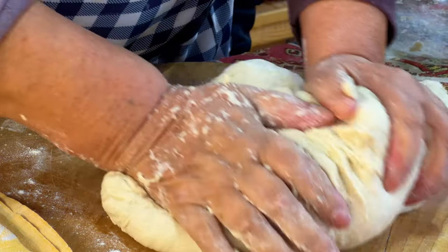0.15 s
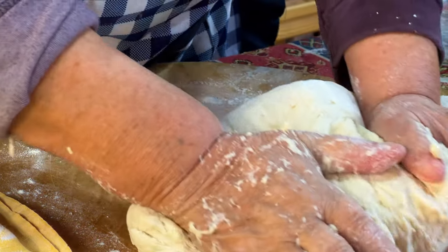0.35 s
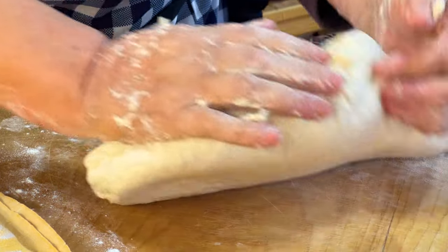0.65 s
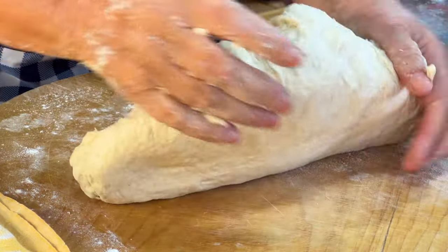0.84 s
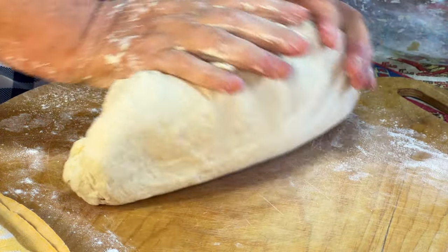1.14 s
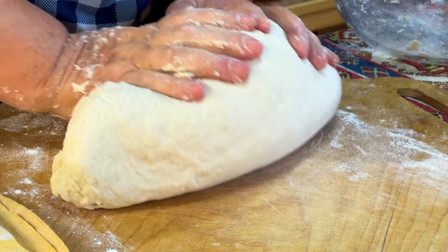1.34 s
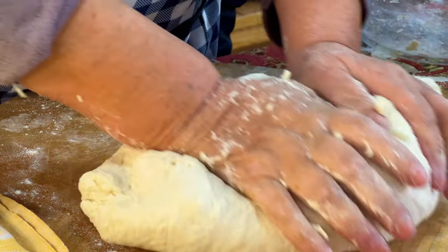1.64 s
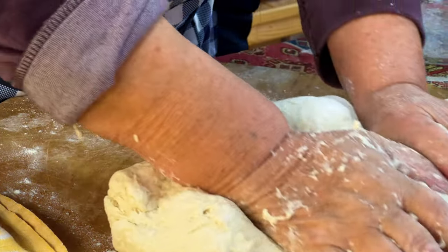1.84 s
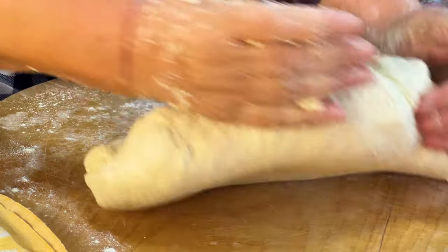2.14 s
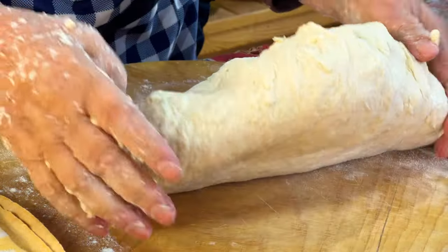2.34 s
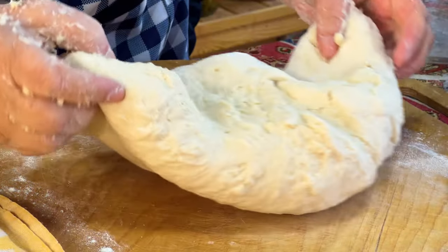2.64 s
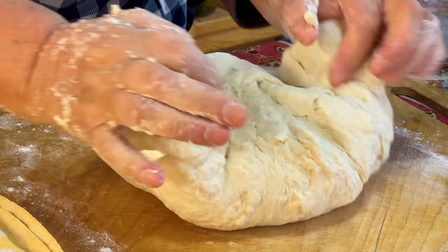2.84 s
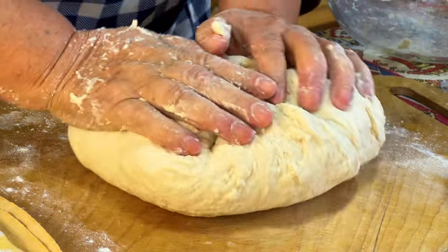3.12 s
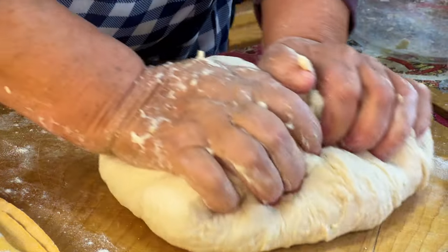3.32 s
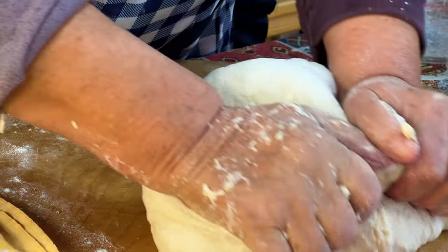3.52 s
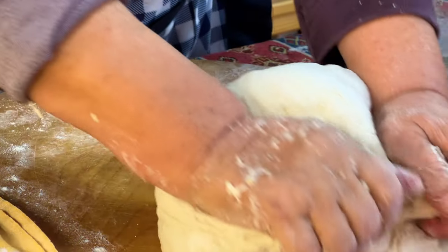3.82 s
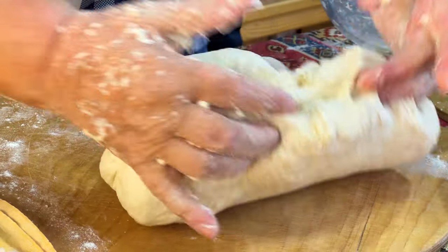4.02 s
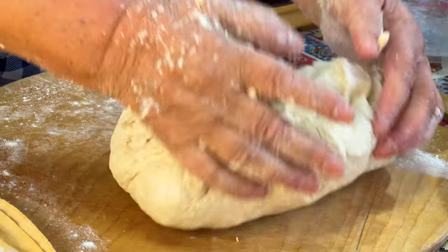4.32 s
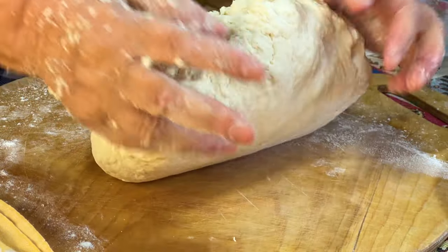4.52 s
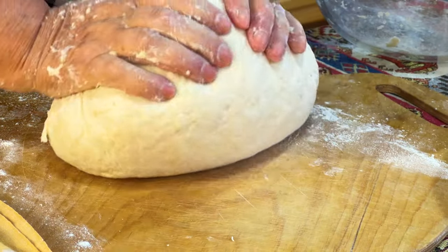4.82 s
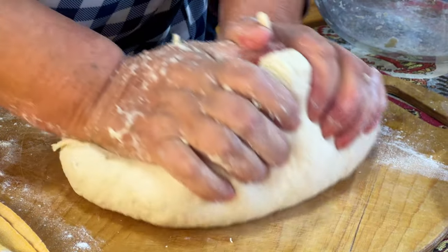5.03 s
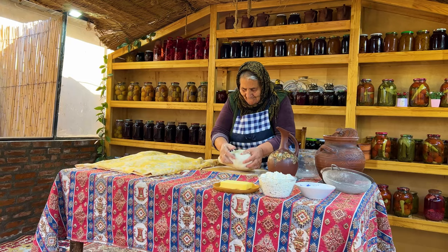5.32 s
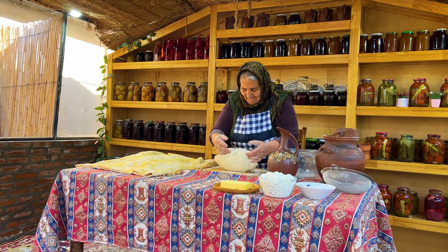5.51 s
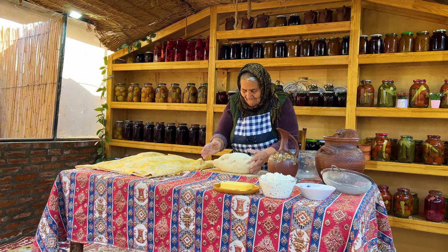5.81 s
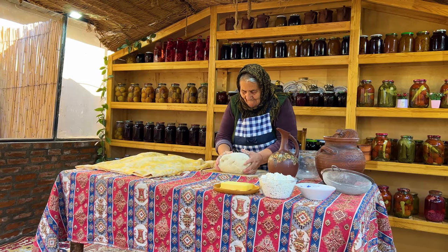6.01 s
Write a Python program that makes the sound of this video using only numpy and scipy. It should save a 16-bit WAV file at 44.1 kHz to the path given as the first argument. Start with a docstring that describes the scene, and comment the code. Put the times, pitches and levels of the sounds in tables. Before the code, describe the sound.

Uneven kneading in a small, dry room, miked close and nearly central. Deep soft thuds and a trembling table lie under grainy, tacky rubbing, short drags and moist slaps. The hardest blow knocks the board before halfway; a thin squeak and clack follow, then another cluster of thumps. In the last moments the sound turns more distant and roomier, with two almost joined clacks.

```python
"""Bread dough is kneaded by hand on a floured wooden board on a table, heard at first from close by.
From the start palms rub and drag the dough (banded noise in tiny slips, sticky ticks), the leaning arms
make the table tremble and squash the dough (noise and a wandering resonance), shoves boom and knocks ring
(decaying sines), and pats smack and pop (noise bursts and sines). The loudest knock comes near 2.4 s, a thin
squeak and a clack of the board just after 3.1 s, and from 5.5 s the work, with two more clacks, is across the room."""
import sys
import numpy as np
from scipy import signal
from scipy.fft import rfft, irfft, next_fast_len
from scipy.io import wavfile
from scipy.ndimage import uniform_filter1d

SR = 44100
rng = np.random.default_rng(int(sys.argv[2]) if len(sys.argv) > 2 else 0)


def transcribe(signal):
    """Save signal, clipped to [-1, 1], as a 16-bit WAV file at the path in sys.argv[1]."""
    frames = np.atleast_2d(signal).T
    limited = np.clip(frames, -1, 1)
    pcm = np.round(limited * 32767).astype(np.int16)
    wavfile.write(sys.argv[1], SR, pcm)


N = 271744
TIME = np.arange(N) / SR

# All event levels are relative: each source weighs them further.
# the lump dragged over the floured board:
# (time of peak [s], rise [s], fall [s], level [dB], brightness [dB])
DRAGS = [(0.679, 0.11, 0.07, -32.5, 1.5), (1.549, 0.095, 0.069, -43, 0), (2.161, 0.071, 0.1, -31.0, 2),
         (2.695, 0.12, 0.047, -34.5, 3), (3.501, 0.22, 0.12, -44.0, -23), (3.978, 0.11, 0.15, -37.5, 1),
         (5.96, 0.058, 0.094, -50.5, -6), (6.165, 0.083, 0.044, -47.0, 0.5)]
# palms rubbing over the dough: (time of peak [s], rise [s], fall [s], level [dB], brightness [dB])
RUBS = [(0.0, .1, 0.12, -43, -0.5), (0.228, 0.087, .035, -45.5, 2), (0.32, 0.057, 0.039, -42, -4),
        (1.03, 0.096, .07, -46, 1), (1.14, 0.12, 0.041, -46.5, -9), (1.27, 0.098, 0.051, -42.5, -0.5),
        (1.69, 0.43, 0.32, -45, -2), (2.437, 0.13, 0.063, -43, -2), (2.86, 0.067, 0.056, -47.5, 2),
        (2.98, 0.11, .09, -50, -14), (3.154, 0.095, 0.067, -45, -1.5), (3.28, 0.052, 0.083, -45.5, 2.5),
        (3.65, 0.19, 0.17, -48, -2), (4.39, 0.18, 0.18, -49.5, -20), (4.475, 0.055, 0.048, -48.5, 7),
        (4.598, .007, 0.16, -43.5, 0.5), (4.818, .09, 0.049, -43.5, -1), (5.03, 0.082, 0.072, -43.5, -4.5),
        (5.2, 0.22, 0.21, -48.5, -3), (5.503, 0.0094, 0.074, -51, 4.5)]
# a sleeve brushing along as the arm stretches out in a long push: (time of peak [s], level [dB])
SLEEVES = [(0.444, -42.5), (1.932, -44), (3.77, -48.5), (5.384, -47.0)]
SLEEVE_RISE_S, SLEEVE_FALL_S = 0.1, 0.094
# band balance of each kind of slide: (low rasp [dB], middle rub [dB], high hiss [dB])
DRAG_COLOUR_DB = (-1.5, -1.5, -3.5)
RUB_COLOUR_DB = (-4.5, 0.1, -5)
SLEEVE_COLOUR_DB = (0.7, -5, 1.05)
# hands that merely lie on the dough: (low rasp [dB], middle rub [dB], high hiss [dB])
RESTING_DB = (-60, -64, -71)
STROKE_SHAPE = 1.77  # exponent of a stroke's swell and fade: 1 pointed, 2 round
BRIGHT_THINS = 0.24  # share of a stroke's brightness that its low rasp loses
SQUEAK_S, SQUEAK_HZ, SQUEAK_DB = 3.15, 4260, -58

# the arms leaning on the dough:
# (time of full weight [s], hold [s], table rumble level [dB], dough squashing level [dB])
LEANS = [(-0.05, .3, -28, -41), (0.457, 0.15, -29.5, -38), (0.752, 0.056, -29.5, -40.5),
         (0.895, 0.66, -27.5, -39.5), (1.56, 0.6, -30.5, -45), (2.012, 0.17, -27.5, -37.5),
         (2.388, 0.035, -25.5, -31), (2.487, 0.29, -34.5, -45), (2.821, 0.47, -28.5, -43),
         (3.36, 0.64, -28, -44), (3.909, 0.14, -29, -34.5), (4.28, 0.14, -31.5, -40),
         (4.528, 0.22, -29.5, -42.5), (4.905, 0.29, -35, -44.5), (5.336, 0.44, -29, -47),
         (5.875, .28, -33, -45)]
LEAN_ATTACK_S, LEAN_RELEASE_S = 0.051, 0.056  # linear rise; time constant of the decay
RESTING_RUMBLE_DB, RESTING_SQUASH_DB = -38.5, -47
# main resonance of the table, shifting with the place of the push: (time [s], frequency [Hz])
TABLE_PITCH = [(0, 93.03), (3.2, 88.26), (4.7, 92.8), (5.2, 87.83), (5.45, 72.54), (5.75, 72.3), (6.16, 88)]

# shoves that set the table booming: (time [s], level [dB], frequency [Hz])
SHOVES = [(0.219, -30, 100.5), (0.764, -25, 96.5), (0.89, -18, 62), (1.096, -13.5, 84.6),
          (1.227, -11.5, 105), (1.41, -19, 91.6), (1.464, -15.5, 80), (1.874, -20, 87), (2.398, -12.5, 65),
          (2.836, -17.5, 93.5), (2.957, -10, 84), (3.005, -13.5, 89), (3.433, -15.5, 87),
          (3.557, -16.5, 93), (3.795, -20, 81), (3.942, -14, 93), (4.139, -17, 84), (4.283, -16.5, 75),
          (4.376, -20, 87.5), (4.512, -22, 86), (5.019, -20, 84.6), (5.58, -15, 71), (5.741, -23.5, 96),
          (5.896, -21, 125), (6.069, -17.5, 69)]
# the board knocking under the lump: (time [s], level [dB], settled base frequency [Hz], base T60 [s])
KNOCKS = [(0.03, -28, 194, 0.045), (0.225, -28, 306, 0.1), (0.875, -14.5, 235.5, 0.067),
          (0.958, -19, 178, 0.022), (1.096, -23, 200, 0.058), (1.24, -16, 190, 0.04),
          (2.066, -21, 224, 0.073), (2.336, -21.5, 183, 0.047), (2.382, -5.5, 256, 0.083),
          (2.397, -18.5, 228, 0.11), (2.423, -21.5, 231.4, 0.24), (3.222, -26.5, 365, 0.26),
          (3.952, -42, 219, 0.06), (4.001, -34, 227, 0.07), (4.134, -21, 269, 0.043),
          (4.272, -14.5, 264, 0.024), (4.307, -10, 169, 0.077), (4.548, -22, 170, 0.069),
          (5.021, -20, 217, 0.052), (5.74, -16.5, 272, 0.028)]
# modes of the board: (multiple of the base frequency [ratio], level [dB])
BOARD = [(0.999, 1), (1.42, -18.5), (1.9, -10)]
# pats of skin on dough:
# (time [s], level [dB], trapped-air frequency [Hz], treble share [dB], smack rise [s], smack T60 [s])
PATS = [(0.563, -24.5, 570, -19, 0.0072, 0.051), (0.577, -21.5, 1914, -40, 0.0037, 0.086),
        (0.874, -19, 924, -18.5, 0.00078, 0.095), (0.959, -31.5, 610, -18, 0.00086, 0.022),
        (2.057, -21, 1280, -42, 0.0013, 0.1), (2.075, -18, 1190, -36, 0.0026, 0.085),
        (2.377, -18.5, 1157, -17, 0.0017, 0.02), (2.417, -18.5, 1460, -22, 0.0012, 0.06),
        (3.889, -26, 1300, -17.5, .007, 0.18), (3.961, -23.5, 1150, -29, 0.0055, 0.045),
        (4.103, -42, 1090, 3, 0.013, 0.049), (4.255, -20.5, 690, -23, 0.0035, 0.033),
        (4.272, -25.5, 666, -9.5, 0.0008, 0.073), (4.355, -31, 890, -38, 0.00094, 0.043),
        (4.548, -32.5, 600, -37, 0.0013, 0.025), (4.6, -42, 730, -21, .0015, 0.016)]
# the board tipping and clacking on the table:
# (time [s], level [dB], factor on the mode frequencies [ratio], scrape level [dB])
CLACKS = [(3.2471, -15.5, 0.91, -25), (5.73, -21, 0.9, -7), (5.7376, -11.5, 0.99, -22)]
# modes the clacks ring with, before that factor: (frequency [Hz], level [dB], T60 [s])
CLACK_MODES = [(183, -9, 0.046), (345, -7, 0.031), (786, -8, 0.028), (1040, -1.5, 0.014),
               (2160, -7.5, 0.013), (2730, -10, 0.016), (4140, -20, .011)]

# spectra of sliding, cracking wood, table rumble, squashed dough and pats:
# (frequency [Hz], relative density [dB per Hz])
RUB = [(200, -1), (450, -0.5), (600, -4), (820, -7), (1050, -3.5), (1300, -2), (1600, -3), (2500, 1),
       (3200, -7.5), (4000, -20.5), (5300, -16.5), (7200, -13.5), (8400, -17.5), (9700, -33.5),
       (12000, -31.5), (16000, -33)]
CRACK = [(300, 4), (1000, 17.5), (1450, 1), (2200, 3), (3300, 4.5), (6200, 1), (8500, -11), (16000, -20)]
RUMBLE = [(20, -36), (33, -29), (48, -3.5), (62, 9), (80, 1.5), (100, 3), (125, 4), (170, -10.5),
          (300, -40.5), (2000, -110)]
SQUASH = [(30, -51), (110, -4), (170, 0.5), (240, -2), (330, -2.5), (450, -8.5), (700, -31), (3000, -108)]
PAT = [(200, -4), (450, 2.5), (700, 0.5), (1100, 0.5), (1600, 0.5), (2400, 0.5), (3200, -5.5), (4100, -15),
       (5500, -10.5), (7500, -3), (9500, -22), (16000, -27)]
# spectrum of the still air of the room: (frequency [Hz], relative density [dB per Hz])
AIR = [(25, 11), (70, -6), (200, 0.5), (500, -45), (1500, -25), (4000, -37), (8000, -34), (12000, -37.5),
       (16000, -38)]
# correlation of left and right in all coloured noise: (frequency [Hz], likeness [0 to 1])
LIKENESS = [(60, 1), (290, 1), (640, 0.8), (1400, 1), (7000, 1), (10000, 0.94), (14000, 1)]
# phase between left and right in the close part, read as constant below the second row:
# (frequency [Hz], lead of the left [rad])
NEAR_PHASE = [(0, 0), (780, 0.2), (1720, -0.3), (3190, 0.7), (5250, 0.0), (8700, 0.1), (9730, -3.1),
              (10400, -3.1), (11700, -6.1), (12400, -6.4), (13200, -8.9), (14300, -9.8), (15200, -12.5),
              (16500, -12.6)]
# phase between left and right from across the room, where the left lags in the table's low notes:
# (frequency [Hz], lead of the left [rad])
FAR_PHASE = [(50, -.1), (130, -.5), (250, -2.0), (420, -1.5), (620, -2.2), (1000, 0), (16000, 0)]

AIR_DB, ROOM_T60_S, NEAR_ROOM_DB, FAR_ROOM_DB = -40, 0.097, -17, -9.5
FAR_FROM_S = 5.48  # from here on the work is heard from across the room
NEAR_PAN_DB, FAR_PAN_DB = 0.4, 1.1  # gain to the right, equal loss to the left
CUTOFF_HZ = 15900


def friction(slides, drag_hz=1600, hiss_hz=3800, body_hz=850, bite=0.2, even_db=-46, grain_db=1.0,
             grains_per_s=900, slip_db=0.92, slips_per_s=130, catch_db=1.5, catches_per_s=110):
    """Stick-slip: skin and dough slide in tiny slips; heavy dragging sounds low, light brushing high."""
    drag_db, palm_db, hiss_db = 20 * np.log10(slides)
    # the harder the drag, the more its rasp stands out over its dull body
    rasp_db = np.clip(bite * (drag_db - even_db), -3, 3)
    # the rasp catches and lets go unevenly
    uneven_db = catch_db * flutter(catches_per_s)
    body = rms_one(cut(noise(RUB), [420, body_hz], "band", order=3)) * from_db(drag_db - rasp_db)
    rasp = rms_one(cut(noise(RUB), [body_hz, drag_hz], "band", order=3))
    rasp = rasp * from_db(drag_db + rasp_db + uneven_db)
    palm = rms_one(cut(noise(RUB), [drag_hz, hiss_hz], "band", order=4)) * from_db(palm_db)
    hiss = rms_one(cut(noise(RUB), hiss_hz, "high", order=4)) * from_db(hiss_db)
    slips = from_db(grain_db * flutter(grains_per_s) + slip_db * flutter(slips_per_s))
    return ((body + rasp) / np.sqrt(2) + palm + hiss) * rms_one(slips)


def slide_gains():
    """Power summation: overlapping slides add in power, in the low rasp, middle rub and high hiss."""
    sleeves = [(s, SLEEVE_RISE_S, SLEEVE_FALL_S, db, 0) for s, db in SLEEVES]
    kinds = ((DRAGS, DRAG_COLOUR_DB), (RUBS, RUB_COLOUR_DB), (sleeves, SLEEVE_COLOUR_DB))
    brightening = np.array([-BRIGHT_THINS, 0, 1])
    power = from_db(RESTING_DB)[:, None] ** 2 * np.ones(N)
    for rows, colour_db in kinds:
        for s, rise_s, fall_s, db, bright_db in rows:
            gains = from_db(db + np.array(colour_db) + bright_db * brightening)
            power += np.outer(gains, stroke(s, rise_s, fall_s)) ** 2
    return np.sqrt(power)


def stroke(s, rise_s, fall_s):
    """Sliding speed as an envelope: it gathers, peaks at 1 at time s and slows down."""
    side_s = np.where(TIME < s, rise_s, fall_s)
    away = np.abs(TIME - s) / np.maximum(side_s, 1e-3)
    return np.exp(-np.minimum(away, 8) ** STROKE_SHAPE)


def stickiness(palm, level_db=-16, per_s=160, spread_db=11.0, count=6):
    """Adhesion: tacky spots let go of the skin in tiny dry ticks, louder as the palms work harder."""
    sizes = from_db(np.minimum(spread_db * rng.exponential(1, N), 14))
    ticks = sizes * (rng.random(N) < per_s / SR)
    # each tick is dealt at random to one of several pitch bands
    dealt = rng.integers(0, count, N)
    out = np.zeros(N)
    for k, hz in enumerate(np.geomspace(900, 6500, count)):
        band = cut(ticks * (dealt == k) + 1e-18, [hz / 2, hz * 2], "band")
        out += rms_one(band) * from_db(at_hz(RUB, hz))
    return rms_one(out) * palm * from_db(level_db)


def squeak(length_s=0.041, width_hz=260):
    """Narrow-band friction tone: one faint, thin squeak as the dough is gripped."""
    tone = rms_one(flutter(width_hz) * np.sin(2 * np.pi * SQUEAK_HZ * TIME))
    return from_db(SQUEAK_DB) * stroke(SQUEAK_S, length_s, length_s) * tone


def pressing(drag, drag_db=-6, rumble_db=-2.0, mode_db=-0.5, mode_width_hz=14, squash_db=-0.27,
             lumpy_db=3.0, steady_s=0.0383):
    """Forced vibration: the arms' weight keeps the table trembling while the dough gives way in lumps."""
    table, dough = lean_gains()
    pitch_s, pitch_hz = np.transpose(TABLE_PITCH)
    turn = 2 * np.pi * np.cumsum(np.interp(TIME, pitch_s, pitch_hz)) / SR
    # random pushes feed the main resonance, so its strength and phase wander
    mode = rms_one(flutter(mode_width_hz) * np.cos(turn) + flutter(mode_width_hz) * np.sin(turn))
    tremble = from_db(rumble_db) * noise(RUMBLE) + from_db(mode_db) * mode
    # a steady push: evened out first, the tremble then follows the weight
    power = uniform_filter1d(np.mean(tremble ** 2, axis=0), int(steady_s * SR))
    tremble = tremble * np.sqrt(power.mean() / (power + 1e-6))
    # dough is squashed both by leaning and by dragging
    effort = np.hypot(dough, drag * from_db(drag_db))
    squash = noise(SQUASH) * effort * from_db(squash_db + lumpy_db * flutter(40))
    return tremble * table + squash


def lean_gains():
    """Static load: the weight comes on, is held and let go, driving table rumble and dough squashing."""
    gains = from_db([[RESTING_RUMBLE_DB], [RESTING_SQUASH_DB]]) * np.ones(N)
    for s, length_s, table_db, dough_db in LEANS:
        attack = np.clip((TIME - s) / LEAN_ATTACK_S + 1, 0, 1)
        release = np.exp(-np.clip(TIME - s - length_s, 0, 1) / LEAN_RELEASE_S)
        gains = np.maximum(gains, np.outer(from_db([table_db, dough_db]), attack * release))
    return gains


def shoves(level_db=0.5, rise_s=0.014, t60=0.083):
    """Damped oscillation: the heel of the hand lands softly and the table top swings a few cycles."""
    out, t = np.zeros(N), TIME[:SR // 2]
    for s, db, hz in SHOVES:
        boom = swell(t, rise_s, t60) * np.sin(2 * np.pi * hz * t)
        add(out, s, from_db(db + level_db) * boom)
    return out


def knocks(level_db=-3.0, rise_s=0.0016, sag=0.72, sag_s=0.0013, damping=0.91):
    """Modal ringing: the board's pitch sinks as dough settles on it; higher modes are damped first."""
    out, t = np.zeros(N), TIME[:SR // 2]
    # warped time: the pitch starts higher by the share sag and settles within milliseconds
    settling = t + sag * sag_s * (1 - np.exp(-t / sag_s))
    for s, db, hz, t60 in KNOCKS:
        for ratio, mode_db in BOARD:
            envelope = swell(t, rise_s, t60 / ratio ** damping)
            ring = envelope * np.sin(2 * np.pi * hz * ratio * settling)
            add(out, s, from_db(db + level_db + mode_db) * ring)
    return out


def pats(pop_db=-8, smack_db=-7.0, pop_t60=0.023, treble_hz=3800, treble_db=8.5, lead_db=-18, lead_s=0.0051):
    """Impact and air resonance: skin brushes and smacks the dough, and the air squeezed out pops."""
    out, t = np.zeros((2, N)), TIME[:SR // 5]
    brush = noise(PAT)
    for s, db, hz, share_db, rise_s, t60 in PATS:
        body = rms_one(cut(noise(PAT, size=len(t)), treble_hz, "low", order=4))
        treble = rms_one(cut(noise(PAT, size=len(t)), treble_hz, "high", order=4))
        contacts = body + treble * from_db(share_db + treble_db)
        smack = contacts * swell(t, rise_s, t60) * from_db(smack_db)
        pop = np.sin(2 * np.pi * hz * t) * swell(t, rise_s, pop_t60) * from_db(pop_db)
        add(out, s, from_db(db) * (smack + pop))
        out += brush * from_db(db + lead_db) * np.exp(-np.abs(TIME - s) / lead_s)
    return out


def clacks(rise_s=0.0013, crack_db=-8, crack_t60=0.048, lead_s=0.0025):
    """Impact excitation of modes: the wood scrapes for an instant, cracks on the table and rings."""
    out, t = np.zeros((2, N)), TIME[:SR // 5]
    scrape = noise(CRACK)
    for s, db, pitch, scrape_db in CLACKS:
        rings = np.zeros(len(t))
        for hz, mode_db, t60 in CLACK_MODES:
            rings += from_db(mode_db) * np.sin(2 * np.pi * hz * pitch * t) * swell(t, rise_s, t60)
        crack = noise(CRACK, size=len(t)) * from_db(crack_db - 60 * t / crack_t60)
        add(out, s, from_db(db) * (rings + crack))
        out += scrape * from_db(db + scrape_db) * np.exp(-np.abs(TIME - s) / lead_s)
    return out


def room(x, wall_hz=4500, lowest_hz=160):
    """Reverberation: dull, diffuse reflections, different in each ear."""
    t = TIME[:SR // 2]
    tail = cut(rng.standard_normal((2, len(t))), [lowest_hz, wall_hz], "band")
    tail = rms_one(tail * swell(t, 0.0008, ROOM_T60_S)) / np.sqrt(len(t))
    return signal.fftconvolve(x, tail, axes=1)[:, :N]


def still_air():
    """Stationary background noise: the still air of the room, steady throughout."""
    return from_db(AIR_DB) * left_right_phase(noise(AIR), NEAR_PHASE)


def left_right_phase(x, phase):
    """Interchannel phase: left and right differ in phase by an amount that depends on pitch."""
    size = next_fast_len(N + SR // 10)
    half = at_hz(phase, np.arange(size // 2 + 1) * SR / size) / 2
    return irfft(rfft(x, size) * np.exp(1j * half * [[1], [-1]]), size)[:, :N]


def noise(spectrum, size=N):
    """Spectral shaping: stereo noise of a given colour, largely alike in both ears; rms 1."""
    hz = np.arange(size // 2 + 1) * SR / size
    mid, side = rfft(rng.standard_normal((2, size)))
    alike = np.clip(at_hz(LIKENESS, hz), 0, 1)
    pair = np.sqrt(1 + alike) * mid + np.sqrt(1 - alike) * side * [[1], [-1]]
    return rms_one(irfft(pair * from_db(at_hz(spectrum, hz)), size))


def flutter(per_s):
    """Random modulation: straight lines between random knots, rms 1."""
    knots = np.arange(0, N / SR + 1, 1 / per_s)
    return rms_one(np.interp(TIME, knots, rng.standard_normal(len(knots))))


def swell(t, rise_s, t60):
    """Exponential decay after a soft contact: it builds up, then dies away; top 1."""
    shape = (1 - np.exp(-(t / rise_s) ** 2)) * from_db(-60 * t / t60)
    return shape / shape.max()


def cut(x, hz, kind, order=2):
    """Frequency selection by a Butterworth filter."""
    return signal.sosfilt(signal.butter(order, hz, kind, fs=SR, output="sos"), x)


def at_hz(points, hz):
    """Interpolation of a spectrum on a logarithmic frequency axis."""
    points = np.array(points)
    return np.interp(np.log(hz + 1), np.log(points[:, 0]), points[:, 1])


def add(out, s, sound):
    """Superposition: mix a sound in from time s."""
    start = int(s * SR)
    out[..., start:start + sound.shape[-1]] += sound[..., :N - start]


def rms_one(x):
    """Power normalisation: scale to unit mean power."""
    return x / np.sqrt(np.mean(x ** 2) + 1e-20)


def from_db(db):
    """Logarithmic level: decibels to amplitude gain."""
    return 10 ** (np.asarray(db) / 20)


def scene(far_db=-0.5):
    """Direct and reflected sound: close by dry and central, from afar roomier and a little to the right."""
    slides = slide_gains()
    drag, palm, _ = slides
    hands = friction(slides) + stickiness(palm) + squeak()
    work = hands + pressing(drag) + shoves() + knocks() + pats() + clacks()
    echo = room(work)
    near_gain = from_db([[-NEAR_PAN_DB], [NEAR_PAN_DB]])
    far_gain = from_db([[far_db - FAR_PAN_DB], [far_db + FAR_PAN_DB]])
    near = left_right_phase(work, NEAR_PHASE) * near_gain + from_db(NEAR_ROOM_DB) * echo
    far = left_right_phase(work, FAR_PHASE) * far_gain + from_db(FAR_ROOM_DB) * echo
    away = np.clip((TIME - FAR_FROM_S) / 0.02, 0, 1)
    return (1 - away) * near + away * far + still_air()


def record(dry, low_cut_hz=30):
    """Band limitation: the microphone loses the deepest bass; the top is cut steeply."""
    steep = signal.ellip(10, 0.1, 90, CUTOFF_HZ, fs=SR, output="sos")
    return signal.sosfilt(steep, cut(dry, low_cut_hz, "high"))


dry = scene()
out = record(dry)
transcribe(out)
```